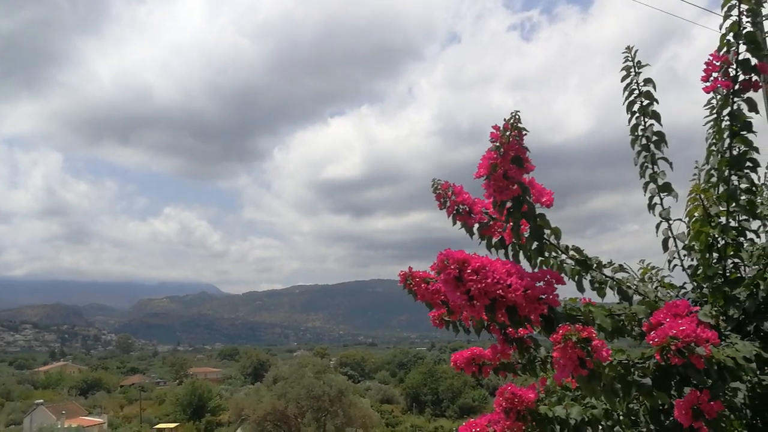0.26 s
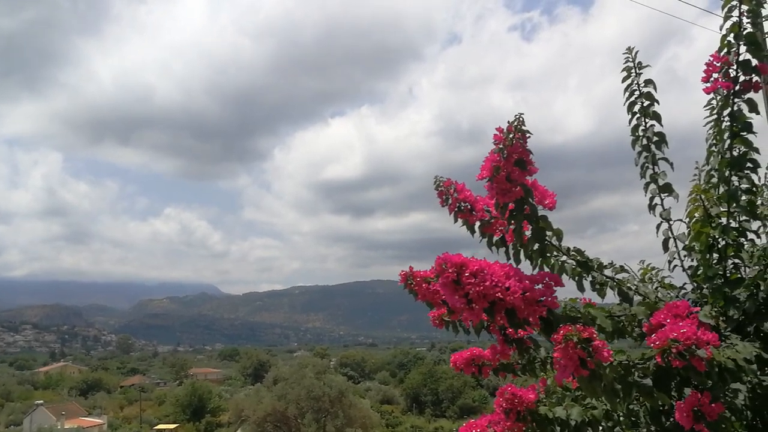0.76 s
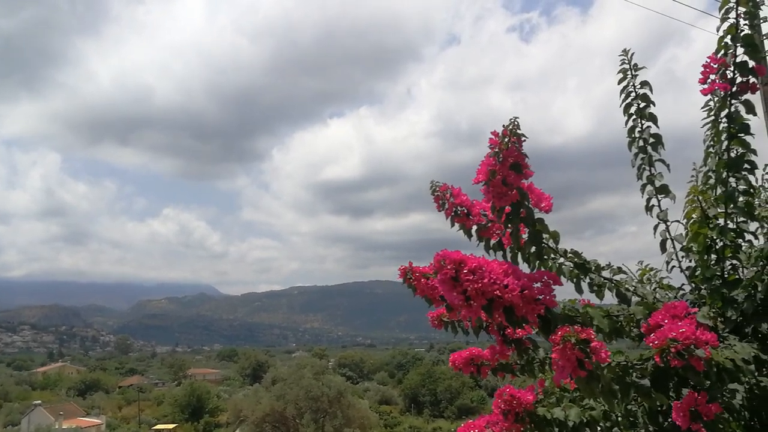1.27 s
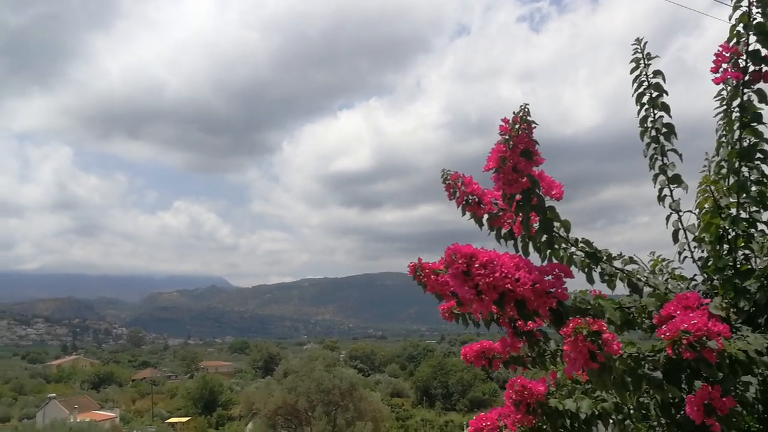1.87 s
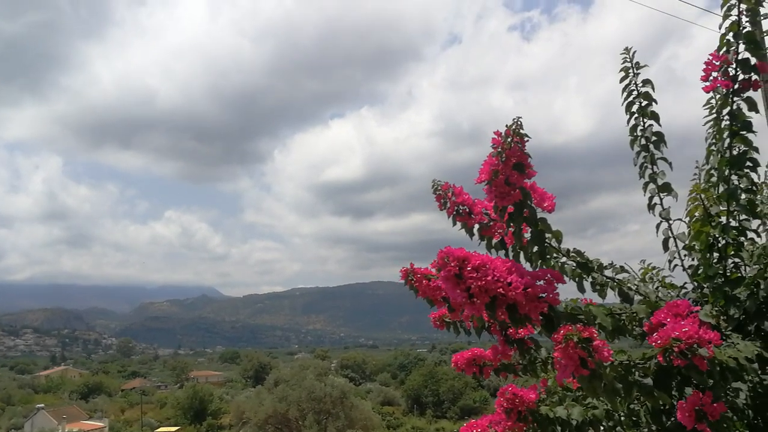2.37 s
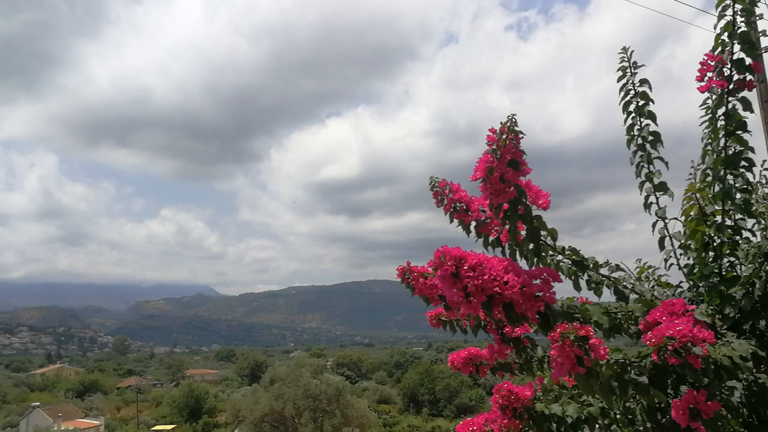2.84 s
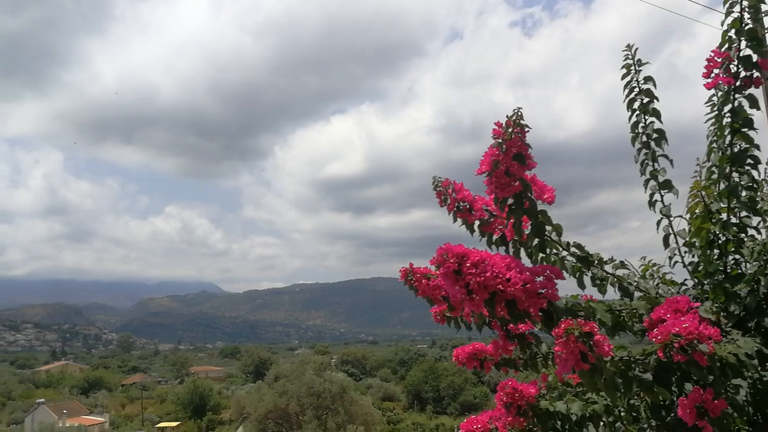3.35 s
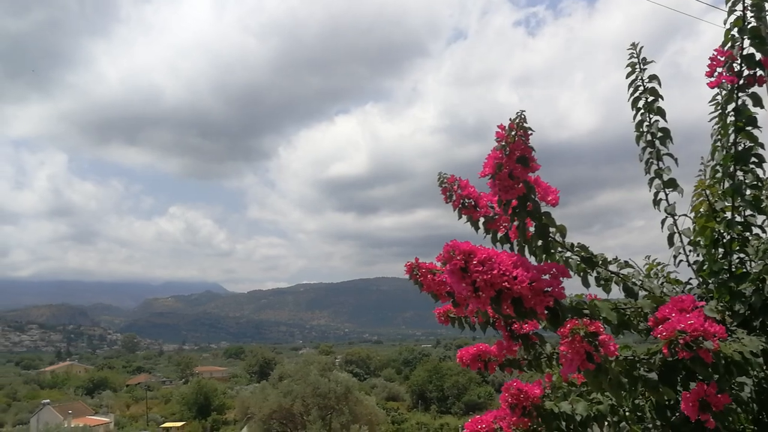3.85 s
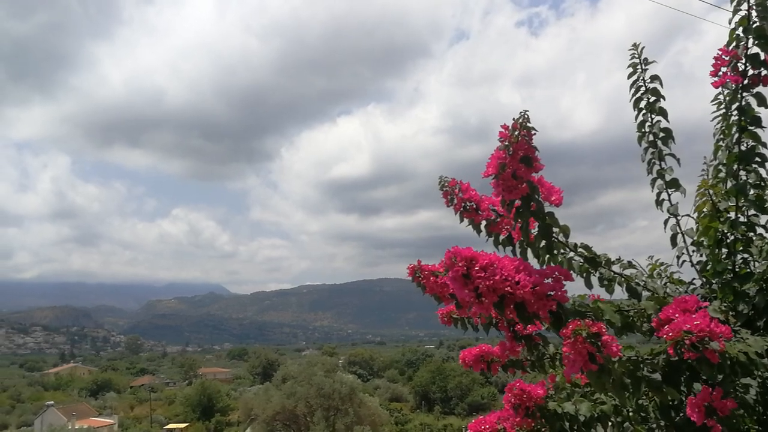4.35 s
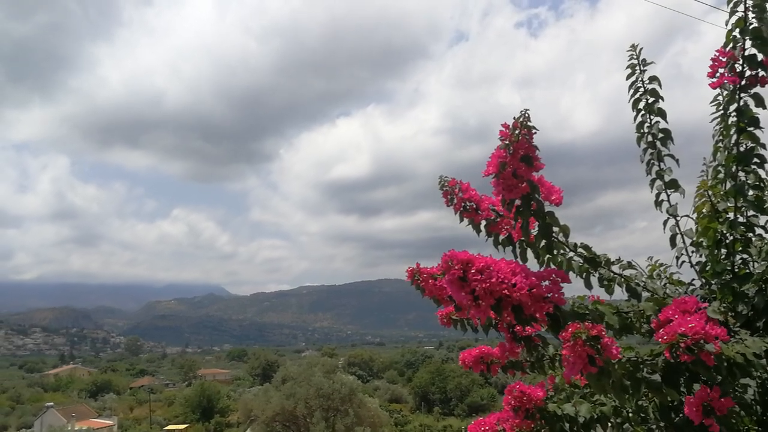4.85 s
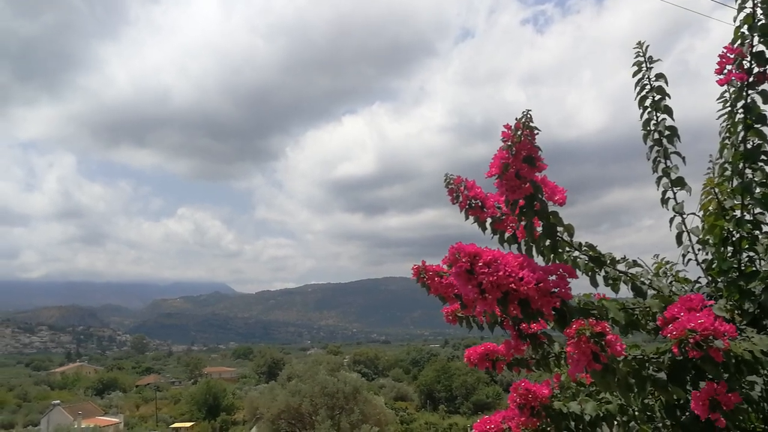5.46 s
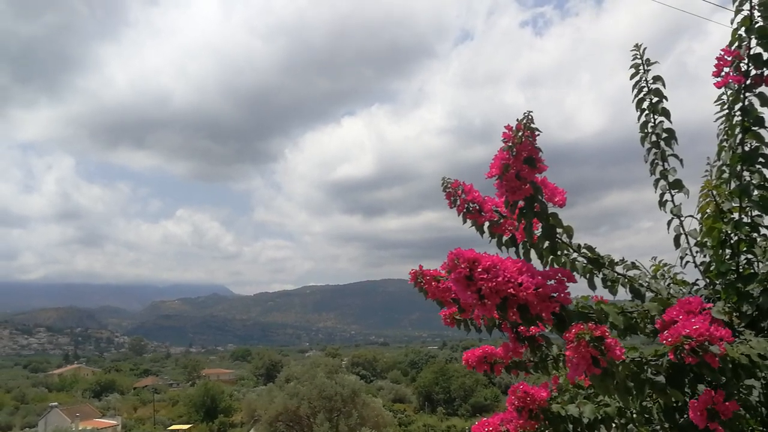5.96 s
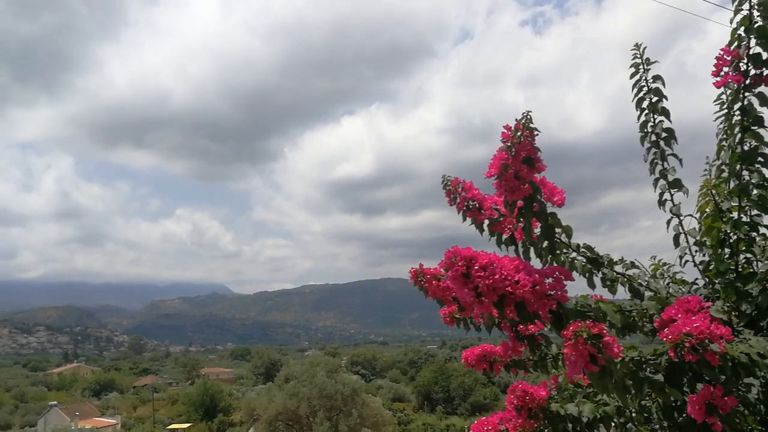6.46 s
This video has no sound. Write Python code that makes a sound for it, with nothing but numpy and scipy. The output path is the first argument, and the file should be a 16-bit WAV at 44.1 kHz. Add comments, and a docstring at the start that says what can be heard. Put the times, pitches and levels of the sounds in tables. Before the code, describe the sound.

A close cicada rasps twelve shrill, whining chirps over about four seconds, then stops, leaving softer cicada groups pulsing over an even distant sizzle.

```python
"""One close cicada sings twelve rasping chirps and stops, on a hot hillside garden. From the start, two groups
chirp in step, more softly, over an even, distant chorus. Every song is made of tymbal clicks scattered by foliage;
wavering tones add a whine to the close one. Beneath lie noise and steady tones for the valley's rumble and hum,
a few puffs of wind made of noise, two dry ticks with a much fainter third, and one far-off call, a fluttering sine."""
import sys
import numpy as np
from scipy import signal
from scipy.fft import rfft, irfft
from scipy.io import wavfile
from scipy.ndimage import uniform_filter1d

SR = 44100
rng = np.random.default_rng(int(sys.argv[2]) if len(sys.argv) > 2 else 0)


def transcribe(signal):
    """Save signal, clipped to [-1, 1], as a 16-bit WAV file at the path in sys.argv[1]."""
    frames = np.atleast_2d(signal).T
    limited = np.clip(frames, -1, 1)
    pcm = np.round(limited * 32767).astype(np.int16)
    wavfile.write(sys.argv[1], SR, pcm)


N = 296352
T = np.arange(N) / SR  # time in seconds
FREQ = np.maximum(np.arange(N // 2 + 1) * SR / N, 1)  # frequencies in Hz, kept above zero for the logarithm


def undb(db):
    """Turn decibels into gain."""
    return 10 ** (np.asarray(db) / 20)


def unit(x):
    """Scale to an rms of one."""
    return x / np.sqrt(np.mean(x ** 2))


def pan(db):
    """Left and right gains for a level difference, left minus right, in dB."""
    return undb(np.array([[db], [-db]]) / 2)


def colour(points):
    """Gain at every frequency, drawn through (Hz, dB) points."""
    hz, db = np.transpose(points)
    return undb(np.interp(np.log(FREQ), np.log(hz), db))


def shape(x, gain):
    """Filter a sound by a gain for every frequency."""
    return irfft(rfft(x) * gain, N)


def walk(rate):
    """Smooth random drift with an rms of one; it heads for a new value 2 * rate times a second."""
    hold = int(SR / rate / 2)
    steps = np.repeat(rng.standard_normal(N // hold + 1), hold)[:N]
    return unit(uniform_filter1d(steps, hold))


def tone(hz, wander_hz, rate):
    """A sine with an rms of one whose pitch wanders."""
    pitch = hz + wander_hz * walk(rate)
    return np.sqrt(2) * np.sin(2 * np.pi * np.cumsum(pitch) / SR)


def envelope(start, end, attack_s, release_s):
    """Rise from the start, hold to the end, then fall away."""
    rise = np.clip((T - start) / attack_s, 0, 1)
    fall = np.clip((end - T) / release_s + 1, 0, 1)
    return rise * fall


def tymbal(rate_hz, jitter, scatter_db, count=3):
    """Muscle twitches at uneven intervals; each buckles a few ribs in quick succession, one click a rib."""
    chance = rng.standard_normal((2400, 2 * count + 1)).T
    twitch = np.cumsum(1 + jitter * chance[0]) / rate_hz
    clicks = np.zeros(N)
    for rib in range(count):
        delay_s = rib * (.0007 + .00012 * chance[1 + rib])
        at = ((twitch + delay_s) * SR).astype(int)
        # each later rib clicks more weakly
        size = undb(scatter_db * chance[1 + count + rib] - 2.6 * rib)
        heard = (at >= 0) & (at < N)
        clicks[at[heard]] += size[heard]
    return clicks


def foliage(x, lag, wet_db, t60):
    """Direct sound reaches the right port lag samples late; leaves and walls scatter a tail to each side."""
    age = T[:SR // 2]
    # the tail falls by 60 dB in t60 seconds
    tail = rng.standard_normal((2, len(age))) * np.exp(-np.log(1000) * age / t60)
    response = undb(wet_db) * unit(tail) / np.sqrt(len(age))
    # a negative lag delays the left port instead
    response[0, max(-lag, 0)] += 1
    response[1, max(lag, 0)] += 1
    return shape(x, rfft(response, N)) / np.sqrt(1 + undb(2 * wet_db))


# Chirps of the close cicada. Each row: start in seconds, end of the hold in seconds, level in dB before trims.
CLOSE_CHIRPS = [(0.0, 0.233, -30.5), (0.355, 0.57, -30.5), (0.694, 0.888, -31), (1.02, 1.218, -32),
                (1.33, 1.565, -30.5), (1.674, 1.876, -29.5), (2.006, 2.223, -31), (2.398, 2.579, -30),
                (2.714, 2.899, -31), (3.03, 3.195, -31), (3.336, 3.51, -30.5), (3.762, 3.962, -31)]
# Sharp resonances of its tymbals and abdomen.
# Each row: pitch in Hz, width to each side in Hz, relative level in dB, left minus right in dB.
BODY_RESONANCES = [(2770, 75, -7, 0.5), (3077, 38, -13.5, 16), (5490, 220, 2, 0), (5678, 132, 5.5, 0),
                   (8332, 140, -0.5, 7), (8456, 107, 4, -10.5), (8600, 43, 4, -7), (10985, 150, -6, -11),
                   (11130, 58, -6, -6), (11420, 89, -5.5, 6)]
# Broad colour of its clicks. Each row: frequency in Hz, relative level in dB.
CLICK_COLOUR = [(1400, -46), (1800, -38.5), (2400, -17), (3400, -11.5), (3900, -23), (4500, -8.5),
                (5000, -17), (5900, -32), (6300, 1), (8200, -6), (9100, -8.5), (10700, -31), (12500, -34),
                (13200, -20), (14200, -17), (15000, -65)]
# Tones its clicks sustain. Each row: pitch in Hz, level against the chirp in dB before trims,
# left minus right in dB.
WHINE_TONES = [(2756, -16.5, 0), (5661, -6.5, 3), (8456, -10, -7), (10988, -20, -3)]


def close_cicada(attack_s=0.023, release_s=0.036, swell_db=6.5):
    """Each chirp starts softly, gains force and breaks off; its clicks ring the body's resonances."""
    effort = np.zeros(N)
    for start, end, db in CLOSE_CHIRPS:
        gate = envelope(start, end, attack_s, release_s)
        remaining = np.clip((end - T) / (end - start), 0, 1)
        effort += gate * undb(db - swell_db * remaining ** 2)
    clicks = tymbal(rate_hz=227, jitter=.028, scatter_db=1.5)
    # each resonance has steep skirts, so the valleys between them stay dark
    rings = 0
    for hz, width, db, side in BODY_RESONANCES:
        rings = rings + undb(db) * pan(side) / (1 + 1j * (FREQ - hz) / width) ** 2
    body = rings + colour(CLICK_COLOUR) * pan(-0.85)
    rasp = unit(shape(clicks, body)) * effort * undb(-2.0)
    rasp = foliage(rasp, lag=-16, wet_db=1.5, t60=.1)
    # wavering tones play the whine of successive clicks falling in step; each side wavers on its own
    whine = 0
    for hz, db, side in WHINE_TONES:
        pair = np.array([tone(hz, 17, 60), tone(hz, 17, 60)])
        whine = whine + undb(db) * pan(side) * pair
    return rasp + whine * effort * undb(2 * walk(60) - 2)


def group(song, lags, wet_db, t60):
    """Several insects of one kind, each with its own click rate, direction and unsteady force."""
    out = 0
    for lag in lags:
        clicks = tymbal(rng.uniform(190, 270), jitter=.06, scatter_db=2)
        clicks = clicks * undb(.7 * walk(7))
        out = out + foliage(clicks, lag, wet_db, t60)
    return unit(shape(out, colour(song)))


# Colours of the low-pitched group, the shrill group and the far chorus.
# Each row: frequency in Hz, relative level in dB.
LOW_COLOUR = [(1700, -41.5), (2500, -14), (3100, -13), (3900, -23.5), (4450, -11), (4950, 1.5),
              (5350, -2.5), (6200, -12), (8000, -40), (10000, -32.5), (15000, -52)]
SHRILL_COLOUR = [(2000, -66), (4200, -44), (5400, -1.5), (6300, -6), (7000, -1), (7750, 2.5), (8500, -4),
                 (9200, -11), (11000, -21.5), (12300, -29), (13300, -25.5), (15500, -48)]
FAR_COLOUR = [(1750, -63), (2200, -12), (2650, -14), (3300, -19), (3950, -30), (4500, -16), (5000, -3.5),
              (5650, 7.5), (6300, -3), (7800, -3.5), (8500, -6), (9300, -17.5), (11400, -15),
              (15500, -31.5)]
# Chirps that the cicadas in nearby trees sing together, about three a second.
# Each row: start in seconds, length before the release in seconds, level against a full chirp in dB.
SHARED_CHIRPS = [(-.15, 0.21, -0.5), (0.273, 0.27, -1), (0.637, 0.26, -2.5), (0.957, 0.26, -0.5),
                 (1.3, 0.28, -1), (1.68, 0.29, -2.5), (2.08, 0.25, -0.5), (2.346, 0.15, -4),
                 (2.629, 0.18, 0.5), (2.983, 0.28, 0), (3.33, .24, -.5), (3.694, 0.26, 0), (4.175, .25, -1),
                 (4.588, .22, -1.5), (4.932, .19, -3), (5.235, 0.31, -2.5), (5.78, 0.22, 0),
                 (6.12, 0.33, -1.5), (6.577, .2, -3.5)]
SWELL_ATTACK_S, SWELL_RELEASE_S = 0.067, 0.075
# level of each group's full chirp by itself, and of the steady buzz beneath it, before panning
LOW_CHIRP_DB, LOW_REST_DB = -39.5, -39.5
SHRILL_CHIRP_DB, SHRILL_REST_DB = -36, -36


def chorus():
    """Two nearby groups chirp in step over their own steady buzz; the far chorus blends into an even sizzle."""
    effort = 0
    for start, length, db in SHARED_CHIRPS:
        effort = effort + undb(db) * envelope(start, start + length, SWELL_ATTACK_S, SWELL_RELEASE_S)
    low = group(LOW_COLOUR, lags=(-26, 27, 26), wet_db=4, t60=.35)
    shrill = group(SHRILL_COLOUR, lags=(27, -26, 26, -28), wet_db=4, t60=.4)
    far = group(FAR_COLOUR, lags=(-27, -16, 6, 26), wet_db=7, t60=.4)
    # buzz and chirp add as powers
    low_gain = np.hypot(undb(LOW_REST_DB), undb(LOW_CHIRP_DB) * effort)
    shrill_gain = np.hypot(undb(SHRILL_REST_DB), undb(SHRILL_CHIRP_DB) * effort)
    nearby = low * low_gain * pan(0.15) + shrill * shrill_gain * pan(-1.6)
    return nearby + far * undb(-42.0) * pan(-.4)


# Colour of the valley air. Each row: frequency in Hz, relative level in dB.
AIR_COLOUR = [(20, -4.5), (45, 6), (63, -0.5), (80, 2.5), (120, 1), (220, -4.5), (350, -7), (520, -17),
              (800, -15), (1100, -23.5), (1700, -24), (3000, -29), (8000, -34.5)]
# Steady tones of distant machinery. Each row: pitch in Hz, middle level in dB.
HUM_TONES = [(147, -72.5), (195, -77)]


def valley():
    """Distant rumble and wavering machine tones; the deep bass is nearly alike in both ports."""
    mid, side = rng.standard_normal((2, N))
    # the sides differ more as frequency rises to 400 Hz
    width = np.minimum(FREQ / 400, 1) ** 2.0
    difference = shape(side, colour(AIR_COLOUR) * width)
    air = shape(mid, colour(AIR_COLOUR)) + np.array([[1], [-1]]) * difference
    swell_db = .6 * walk(2)
    hum = sum(undb(db + 1.5 * walk(3)) * tone(hz, 1.4, 6) for hz, db in HUM_TONES)
    return unit(air) * undb(-67.5 + swell_db) + hum


# Puffs of wind on the microphone. Each row: middle in seconds, spread (one sigma) in seconds, level in dB.
WIND_PUFFS = [(0.603, 0.062, -71), (1.72, 0.062, -62), (1.957, .03, -63), (2.663, 0.048, -60),
              (3.349, 0.044, -46), (3.515, 0.051, -61)]
# Colour of the puffs. Each row: frequency in Hz, relative level in dB.
WIND_COLOUR = [(15, -21), (35, 7.5), (70, -3), (110, -6.5), (200, -25), (400, -31.5), (900, -33),
               (2000, -47)]


def wind():
    """Brief eddies thump softly on the microphone: low noise under bell-shaped swells."""
    force = sum(undb(db) * np.exp(-.5 * ((T - s) / length) ** 2) for s, length, db in WIND_PUFFS)
    return force * unit(shape(rng.standard_normal(N), colour(WIND_COLOUR)))


# Dry ticks. Each row: start in seconds, ring in Hz, decay scale in seconds (loudest after half of it),
# level in dB (the swell peaks 6 dB lower, before panning), left minus right in dB.
DRY_TICKS = [(1.2250, 1240, 0.00085, -32.5, 11), (1.9400, 1180, 0.00062, -29.5, 12),
             (4.498, 597, 0.0028, -57, 9)]


def ticks():
    """Small dry taps: each is a sine that swells at once and dies within a few cycles."""
    out = 0
    for s, hz, decay, db, side in DRY_TICKS:
        age = np.maximum(T - s, 0)
        swell = age / decay * np.exp(1 - 2 * age / decay)
        out = out + pan(side) * undb(db) * swell * np.sin(2 * np.pi * hz * age)
    return out


# A far-off animal call. Each row: time in seconds, middle pitch in Hz, middle level in dB before the foliage.
CALL_PATH = [(3.78, 1040, -100), (3.85, 1050, -78), (3.9, 1055, -74), (4.02, 1065, -75), (4.1, 1095, -78),
             (4.16, 1110, -81), (4.24, 1090, -100)]


def far_call():
    """One thin, hoarse, slightly rising note that flutters, blurred by distance."""
    s, *columns = np.transpose(CALL_PATH)
    hz, db = (np.interp(T, s, c) for c in columns)
    note = tone(hz, wander_hz=26, rate=90) * undb(db + 4 * walk(30))
    sounding = (T > s[0]) * (T < s[-1])
    return foliage(note * sounding, lag=0, wet_db=-3, t60=.1)


def scene():
    """Cicadas above the quiet sounds of the valley."""
    return close_cicada() + chorus() + valley() + wind() + ticks() + far_call()


TOP_HZ = 15650


def record(dry):
    """The recorder cuts the top steeply: a low-pass filter removes what lies above TOP_HZ."""
    low_pass = signal.ellip(10, .1, 80, TOP_HZ, fs=SR, output="sos")
    return signal.sosfilt(low_pass, dry)


dry = scene()
out = record(dry)
transcribe(out)
```